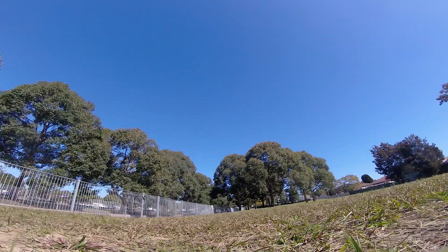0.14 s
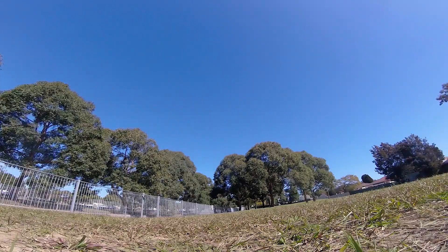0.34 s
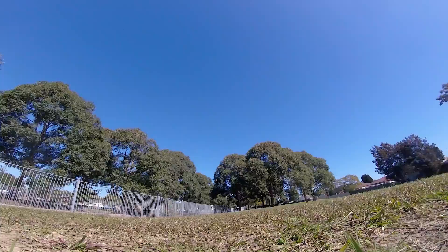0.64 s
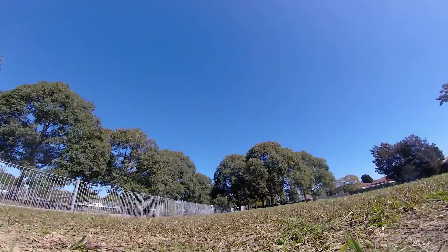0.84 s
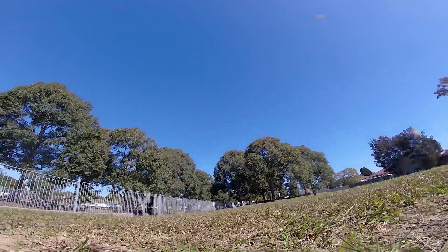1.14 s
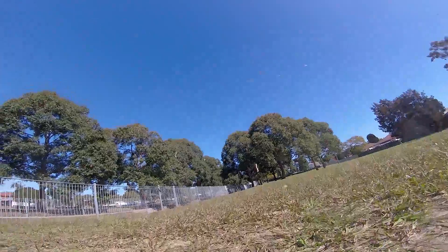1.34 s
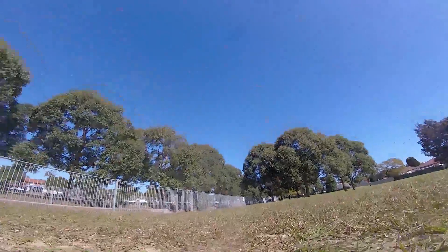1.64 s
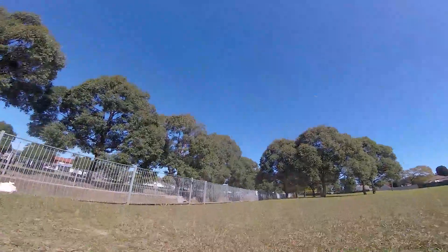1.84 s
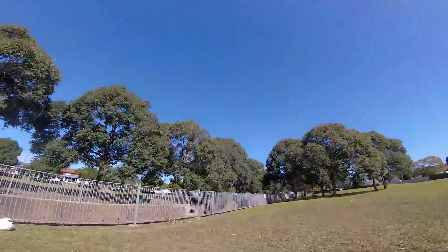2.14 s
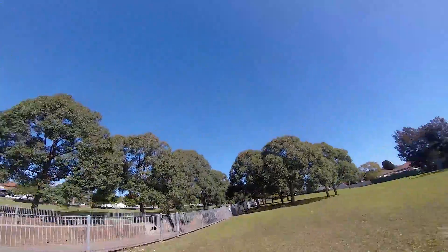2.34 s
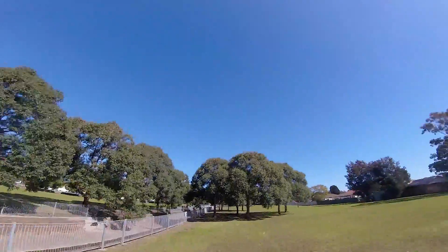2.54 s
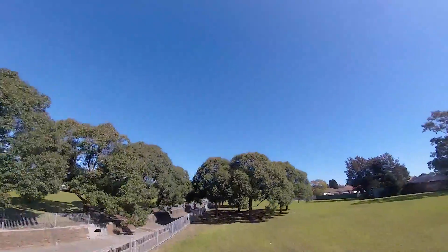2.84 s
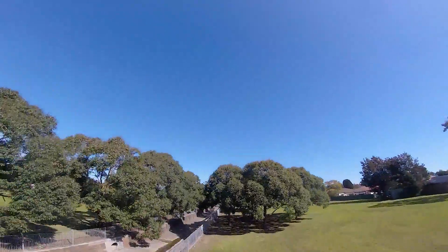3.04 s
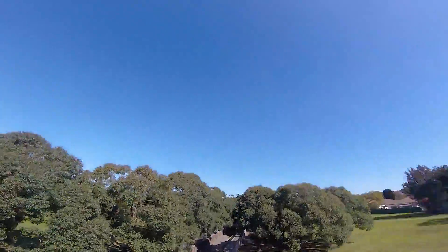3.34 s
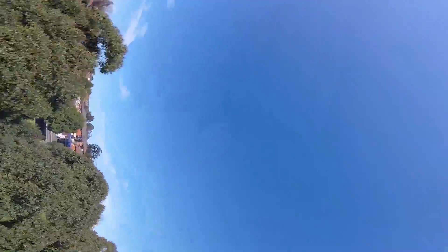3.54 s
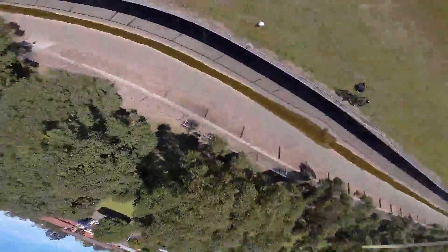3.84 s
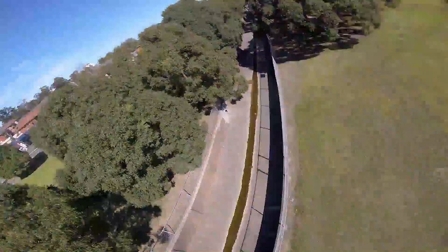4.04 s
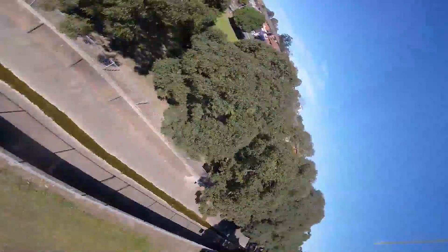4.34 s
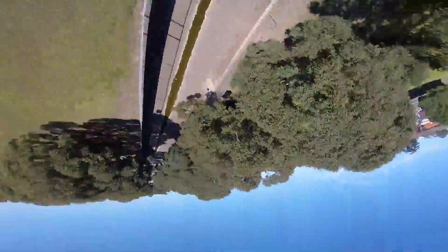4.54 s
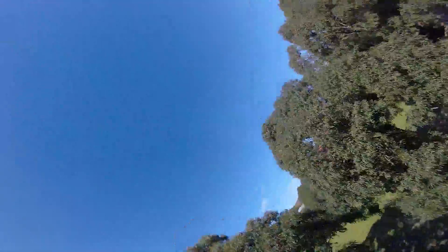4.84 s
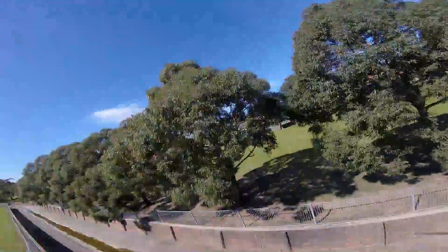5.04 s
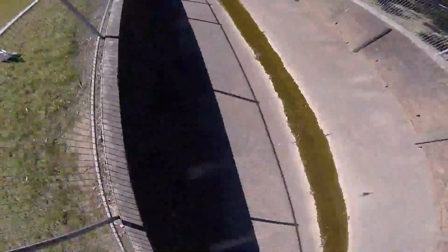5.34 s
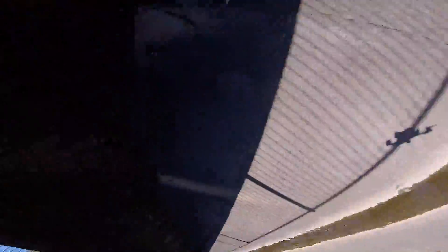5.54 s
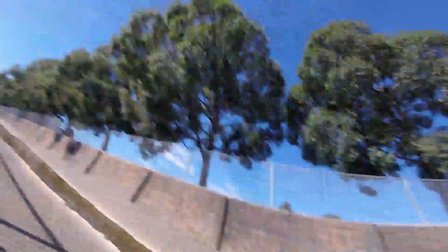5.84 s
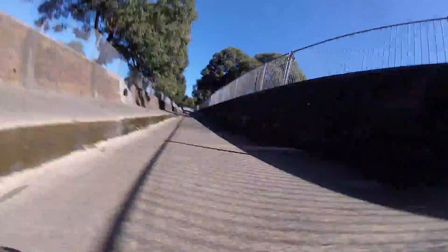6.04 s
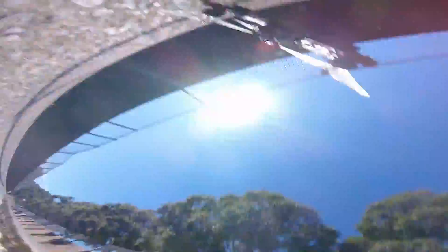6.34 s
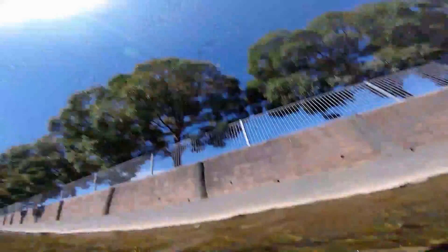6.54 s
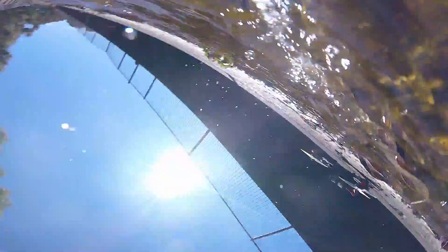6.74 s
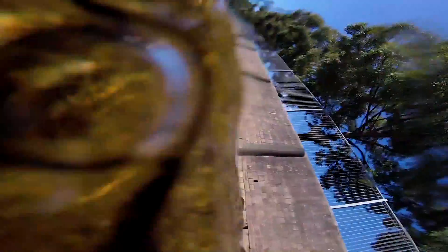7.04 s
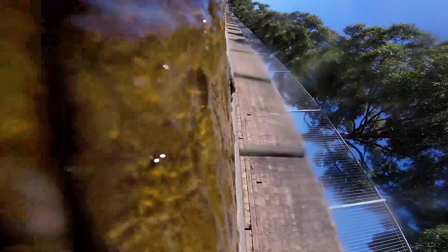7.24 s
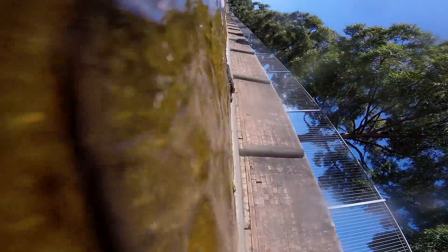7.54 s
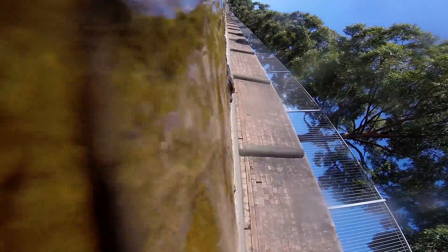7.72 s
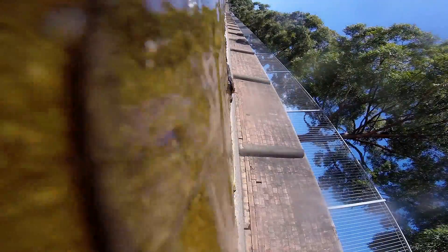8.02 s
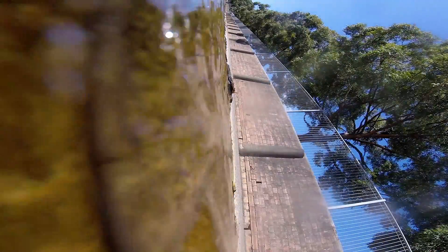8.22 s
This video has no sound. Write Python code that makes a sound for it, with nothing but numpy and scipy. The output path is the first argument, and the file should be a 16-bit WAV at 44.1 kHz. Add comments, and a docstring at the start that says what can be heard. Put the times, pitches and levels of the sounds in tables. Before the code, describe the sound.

Close on an onboard microphone, drone motors tick over softly on grass before the propellers spin up into a loud, wavering whine. A short rattle and a stuttering, falling squeal join in. The whine stops, leaving gusts of wind that swell in a dive. A string of hard, hollow knocks follows as the drone bounces on concrete, ending in a splash, plops and quiet bubbling.

```python
'''A racing quadcopter, heard from its own camera, idles on the grass, then climbs with whining
propellers and a rattling, squealing bearing. It coasts through a flip while a bird calls, then dives
in a growing rush of air. It tumbles down a concrete drain, each blow ringing the camera case,
and comes to rest in shallow water that plops, trickles and fizzes.'''
import sys
import numpy as np
from scipy import signal
from scipy.fft import rfft, irfft, next_fast_len
from scipy.io import wavfile
from scipy.ndimage import uniform_filter1d

SR = 44100
rng = np.random.default_rng(int(sys.argv[2]) if len(sys.argv) > 2 else 0)


def pcm_store(signal):
    """Save signal as 16-bit PCM."""
    levels = np.round(np.clip(np.atleast_2d(signal), -1, 1) * 32767)
    wavfile.write(sys.argv[1], SR, levels.astype(np.int16).T)


N = 369558
TIME = np.arange(N) / SR
LIFT_OFF_S, POWER_OFF_S = 1.17, 3.66


def gain_of(db):
    return 10 ** (np.asarray(db) / 20)


def unit_rms(x):
    return x / np.sqrt(np.mean(x ** 2) + 1e-20)


def phase_of(hz):
    return 2 * np.pi * np.cumsum(hz) / SR


def curves(rows):
    """Each column after time_s, joined by straight lines."""
    time_s, *columns = np.transpose(rows)
    return [np.interp(TIME, time_s, column) for column in columns]


def gate(start_s, end_s):
    """One from start to end, with 10 ms fades outside."""
    return np.clip(np.minimum(TIME - start_s, end_s - TIME) * 100 + 1, 0, 1)


def during(rows):
    return gate(rows[0][0], rows[-1][0])


def swell(peak_s, half_s):
    return np.exp(-np.minimum(((TIME - peak_s) / half_s) ** 2, 60))


def bursts(rows):
    """Envelope of Gaussian rises and exponential decays."""
    return sum(gain_of(db) * np.where(TIME < s, swell(s, rise_s), np.exp(-abs(TIME - s) / decay_s))
               for s, rise_s, decay_s, db in rows)


def add(mix, start_s, sound):
    part = mix[round(start_s * SR):][:len(sound)]
    part += sound[:len(part)]


def colour(x, spectrum):
    """Filters x by (freq_hz, gain_db) rows; unit RMS."""
    hz, db = np.transpose(spectrum)
    bins_hz = np.fft.rfftfreq(N, 1 / SR)
    bins_db = np.interp(np.log(bins_hz + 1), np.log(hz), db, left=-90, right=-120)
    return unit_rms(irfft(rfft(x) * gain_of(bins_db), N))


def noise(spectrum):
    return colour(rng.standard_normal(N), spectrum)


def drift(rate_hz):
    """Random wander up to about rate_hz; unit RMS."""
    size = next_fast_len(N)
    hz = np.arange(0, 10 * rate_hz, SR / size)
    bins = rng.standard_normal(len(hz)) + 1j * rng.standard_normal(len(hz))
    return unit_rms(irfft(bins / (1 + (hz / rate_hz) ** 4), size)[:N])


def noise_band(hz, width_hz):
    return unit_rms(drift(width_hz) * np.sin(phase_of(hz * np.ones(N))))


def crackle(per_s, spread_db):
    """Sparse clicks of uneven size."""
    clicks = (rng.random(N) < per_s / SR) * rng.choice([-1, 1], N)
    return clicks * gain_of(spread_db * np.minimum(rng.exponential(1, N), 4))


def resonate(x, hz, width_hz):
    """Unity-gain resonance, applied twice for steep skirts."""
    b, a = signal.iirpeak(hz, hz / width_hz, SR)
    return signal.lfilter(b, a, signal.lfilter(b, a, x))


# background spectrum: freq_hz, gain_db
AMBIENCE_SPECTRUM = [(50, -22.5), (100, 7), (300, -5.5), (400, -12), (1100, -17), (3700, -36),
                     (6200, -40.5), (6700, -32.5), (11000, -46.5)]

def ambience(level_db=-56):
    """Faint, steady outdoor rumble."""
    return gain_of(level_db) * noise(AMBIENCE_SPECTRUM)


# bird calls: start_s, top_pitch_hz, level_db
CHIRPS = [(4.125, 3350, -68), (4.23, 3270, -68), (4.345, 3200, -64), (4.46, 3100, -67)]

def bird(length_s=0.055):
    """Far chirps sweep up and turn over at the top."""
    out, progress = np.zeros(N), np.linspace(0, 1, round(length_s * SR))
    envelope = 2 * progress * np.sin(np.pi * progress)
    sweep = 1 - 0.71 * (progress - 0.7) ** 2
    for s, hz, db in CHIRPS:
        add(out, s, gain_of(db) * envelope * np.sin(phase_of(hz * sweep)))
    return out


# low surges: peak_s, rise_s, decay_s, level_db
SURGES = [(0.03, 0.059, 0.1, -33), (5.8, 0.058, 0.24, -41.5), (6.63, 0.042, 0.28, -46.5),
          (7.012, 0.018, 0.037, -20), (7.2, 0.01, 0.012, -25.5)]

def rumble(sunk_s=7.3, growth_db_per_s=12.5):
    """Breeze and water surge; the current builds against the sunken case."""
    current = gain_of(-62.5 + growth_db_per_s * (TIME - sunk_s)) * gate(sunk_s, TIME[-1])
    return noise(BUFFET_SPECTRUM) * (bursts(SURGES) + current)


# fine bubbles: time_s, level_db
FIZZ = [(7.46, -77), (7.5, -47), (7.58, -57.5), (7.73, -57), (7.77, -88)]

def fizz():
    """Fine bubbles tick on the sunken case."""
    level_db, = curves(FIZZ)
    bubbles = colour(crackle(per_s=800, spread_db=6.5), [(300, 6.5), (2000, 10), (5200, -5.5), (5900, -36)])
    return bubbles * gain_of(level_db) * during(FIZZ)


# inflow: time_s, centre_hz, level_db
TRICKLE = [(7.04, 2600, -62), (7.3, 2000, -71), (7.52, 2300, -61)]

def trickle():
    """Water bubbles unevenly into the case."""
    hz, db = curves(TRICKLE)
    return gain_of(db + 4.5 * drift(120)) * noise_band(hz, 600) * during(TRICKLE)


# air pockets: start_s, pitch_hz, level_db, t60_s
PLOPS = [(6.996, 468, -18, 0.087), (7.008, 1080, -24.5, 0.04), (6.997, 1720, -24, .05),
         (7.033, 1895, -22.5, 0.031)]

def plops(rise_s=0.0011, glide_per_s=0.55):
    """Trapped air rings with rising pitch as the case goes under."""
    out, t = np.zeros(N), np.arange(SR // 10) / SR
    for s, hz, db, t60 in PLOPS:
        envelope = gain_of(db - 60 * t / t60) * (1 - np.exp(-t / rise_s))
        add(out, s, envelope * np.sin(phase_of(hz * (1 + glide_per_s * t))))
    return out


# water slaps: peak_s, rise_s, decay_s, level_db
SPLASHES = [(6.999, 0.012, 0.0099, -26), (7.04, .012, 0.079, -49.5)]

def splashes():
    """Water slaps round the case."""
    churn = colour(crackle(per_s=900, spread_db=7), [(150, 8.5), (2400, -6), (3500, -20)])
    return churn * bursts(SPLASHES)


# grit on the case: freq_hz, gain_db
GRIT_SPECTRUM = [(300, 3), (1500, 17), (3500, 12.5), (5000, 15), (6000, 4), (6700, 14.5), (8000, -0.5),
                 (10000, -11.5), (14000, -53)]
# showers: peak_s, rise_s, decay_s, level_db
SHOWERS = [(6.585, 0.029, 0.025, -46.5), (6.9, 0.16, 0.12, -61)]

def spray():
    """Grit and spray shower the case."""
    return colour(crackle(per_s=3700, spread_db=6), GRIT_SPECTRUM) * bursts(SHOWERS)


# small hits: start_s, level_db
TICKS = [(5.639, -38), (5.801, -40.5), (6.906, -35), (7.202, -47), (7.433, -45), (7.508, -41)]

def ticks(decay_s=0.00084):
    """Small stones and drops tick on the case."""
    envelope = sum(gain_of(db) * (TIME >= s) * np.exp(-np.minimum(abs(TIME - s) / decay_s, 20))
                   for s, db in TICKS)
    return noise(GRIT_SPECTRUM) * envelope


def dust(level_db=-46):
    """Downwash throws dry grass and dust at the case."""
    grains = noise([(7800, -20), (8400, 0), (9500, 0), (12000, -16)])
    return gain_of(level_db) * swell(1.45, 0.35) * grains * gate(LIFT_OFF_S, POWER_OFF_S)


# frame resonances: peak_s, half_s, centre_hz, width_hz, level_db
FRAME_RINGS = [(1.497, 0.46, 6480, 240, -39), (5.444, 0.15, 6360, 400, -47)]

def frame_rings():
    """Narrow resonances flare under vibration and airflow."""
    rings = sum(gain_of(db) * swell(s, half_s) * noise_band(hz, width_hz)
                for s, half_s, hz, width_hz, db in FRAME_RINGS)
    return rings * gate(LIFT_OFF_S, AIRFLOW[-1][0])


# hollow notes: peak_s, half_s, pitch_hz, level_db
HOOTS = [(0.232, 0.013, 235, -14), (0.247, .018, 143.5, -15), (4.838, 0.0042, 950, -15.5)]

def hoots():
    """The propellers hoot briefly as they catch the air; a short hoot near 950 Hz rings with the blow at 4.84
    s."""
    return sum(gain_of(db) * swell(s, half_s) * np.sin(2 * np.pi * hz * TIME)
               for s, half_s, hz, db in HOOTS)


# swish band: time_s, centre_hz
SWISH = [(5.33, 1003), (5.38, 2710), (5.46, 3300), (5.52, 4870), (5.55, 3085), (5.61, 2000)]

def swish(band_db=-34, tearing_db=-35):
    """Air tears past in the dive, rising and falling with the angle of attack."""
    centre_hz, = curves(SWISH)
    band = gain_of(band_db) * noise_band(centre_hz, 1500)
    tearing = gain_of(tearing_db) * colour(crackle(per_s=2200, spread_db=4), GRIT_SPECTRUM)
    return swell(5.49, 0.096) * (band + tearing) * during(SWISH)


# air under thrust: time_s, wash_db, rush_db, hiss_db
PROP_AIR = [(1.15, -23.5, -37, -31), (1.195, -14, -36.5, -26), (1.45, -24, -31, -27.5),
            (1.63, -13, -31, -23), (2.07, -25, -23, -28), (2.25, -19.5, -24.5, -27),
            (2.69, -24.5, -27, -31), (2.85, -33.5, -33, -26.5), (3.15, -31.5, -29.5, -26.5),
            (3.4, -27, -21.5, -33.5)]
# coast and dive: time_s, level_db
AIRFLOW = [(3.41, -47), (3.82, -45.5), (4.0, -58), (4.4, -42.5), (4.65, -42.5), (4.75, -30), (5.0, -25),
           (5.1, -16.5), (5.3, -23), (5.635, -20.5)]
# gusts and throttle blips: peak_s, half_s, buffet_db, wash_db, rush_db, hiss_db
GUSTS = [(0.188, 0.0049, -30, -14, -50, -29.5), (0.243, 0.034, -28, -12.5, -45, -34.5),
         (0.99, 0.0046, -24, -13, -40, -55), (1.118, 0.021, -42, -22, -38, -29.5),
         (3.434, 0.025, -51, -25, -29, -41.5), (3.559, 0.15, -51, -34, -39.5, -58),
         (3.721, 0.044, -49, -23, -30, -52), (4.346, 0.33, -48, -55, -61, -93),
         (4.824, 0.019, -47, -40, -34, -61), (5.086, 0.0081, -16, -10.5, -39, -52),
         (5.169, 0.015, -26, -9, -24.5, -47), (5.219, 0.054, -33, -17.5, -27.5, -45.5),
         (5.471, 0.15, -26, -44, -25, -44)]
# layer balance, idling and coasting: buffet_db, wash_db, rush_db, hiss_db
IDLE_MIX_DB, AIRFLOW_MIX_DB = (-43, -26.5, -49.5, -44), (-2.5, 1, -29, -37)

def air_gains(idle_growth_db_per_s=10.5):
    """Buffet, wash, rush and hiss gains: idle, thrust, airflow and gusts add in power."""
    wash_db, rush_db, hiss_db = curves(PROP_AIR)
    thrust = gain_of([wash_db - 14.5, wash_db, rush_db, hiss_db]) * during(PROP_AIR)
    idle_db = idle_growth_db_per_s * (TIME - IDLE_S[0]) + 2 * drift(15.4)
    idling = np.outer(gain_of(IDLE_MIX_DB), gain_of(idle_db) * gate(*IDLE_S))
    flow_db, = curves(AIRFLOW)
    flow = np.outer(gain_of(AIRFLOW_MIX_DB), gain_of(flow_db) * during(AIRFLOW))
    gust_power = sum(np.outer(gain_of(db), swell(s, half_s)) ** 2 for s, half_s, *db in GUSTS)
    return np.sqrt(thrust ** 2 + idling ** 2 + flow ** 2 + gust_power) * gate(0, AIRFLOW[-1][0])


# air layers, low to high: freq_hz, gain_db
BUFFET_SPECTRUM = [(12, -25.5), (28, -2), (60, 1.5), (110, -4), (400, -33.5)]
WASH_SPECTRUM = [(70, -33.5), (140, -3), (240, 2.5), (350, -2.5), (480, -1.5), (660, -5), (800, -11),
                 (1000, -18), (2000, -31.5)]
RUSH_SPECTRUM = [(550, -17.5), (900, -1.5), (1300, -2.5), (1800, -3.5), (2400, -6), (3200, -8.5),
                 (3900, -20.5), (5500, -39.5)]
HISS_SPECTRUM = [(2800, 2.5), (4100, 0), (5000, 1.5), (6700, -1.5), (7600, -5.5), (8500, -16), (9600, -19),
                 (12000, -47.5)]

def air(shaft, blades=3):
    """Turbulence at the microphone: the upper layers share gusts; blades chop rush and hiss."""
    buffet_gain, wash_gain, rush_gain, hiss_gain = air_gains()
    gust = drift(40)
    chop = 1 + 0.31 * np.cos(blades * shaft) * gate(LIFT_OFF_S, POWER_OFF_S)
    buffet = noise(BUFFET_SPECTRUM) * buffet_gain
    wash = noise(WASH_SPECTRUM) * wash_gain * gain_of(-5.5 + 1.5 * gust)
    rush = noise(RUSH_SPECTRUM) * rush_gain * gain_of(-5 + 1.7 * gust)
    hiss = noise(HISS_SPECTRUM) * hiss_gain * gain_of(-10 + 1.3 * gust)
    return buffet + wash + chop * (rush + hiss) * gain_of(1.2 * drift(400))


# camera case modes: freq_hz, gain_db, t60_s
CASE_MODES = [(762, 3, 0.014), (920, -6.5, 0.0037), (1184, -1.5, 0.018), (1508, -4.5, 0.023),
              (2040, -1.5, 0.016), (6910, -14, 0.0056)]
# blows: start_s, push_db, contact_s, ring_db, grit_db, grit_decay_s
KNOCKS = [(0.092, -16.5, 0.003, -56, -36, 0.013), (.146, -39, 0.0011, -38, -26, 0.0013),
          (4.838, -27, 0.0012, -16.5, -60, 0.0044), (5.703, -5, 0.0029, -2.5, -11.5, 0.0021),
          (5.711, -2, 0.0062, -46, -40, 0.0052), (5.726, -16, 0.0038, -42.5, -36.5, 0.0093),
          (5.768, -18, 0.0033, -50, -40, 0.00092), (5.8958, -9, 0.0027, -48, -42.5, 0.0049),
          (5.905, -13, 0.0038, -47, -47, 0.00098), (6.119, -12.5, 0.047, -36.5, -27.5, 0.00039),
          (6.228, -22, 0.0044, -54, -41.5, 0.013), (6.241, -21, 0.0015, -47, -43, 0.0063),
          (6.253, -2.5, 0.0039, -50, -29, 0.0023), (6.303, -15, 0.002, -51, -43, 0.0061),
          (6.3227, -27, 0.0013, -36, -32.5, 0.0066), (6.3258, -7.5, 0.0013, -50, -54, 0.0013),
          (6.4118, -11.5, 0.0024, -44, -36, 0.0014), (6.4255, -0.5, 0.00018, -33.5, -34, 0.0019),
          (6.7357, -1.5, 0.0019, -15.5, -26, 0.0027), (6.865, -4, 0.0023, -10, -27.5, 0.0034),
          (6.954, -10, 0.00056, -15.5, -39.5, 0.004), (6.994, -8, 0.0074, -19, -46, 0.0044),
          (7.307, -21.5, 0.0024, -22.5, -55, 0.00059), (7.6876, -13, 0.000071, 5, -22.5, 0.00062),
          (7.748, -35, 0.00012, -48, -23, 0.00082)]

def knocks(rise_s=0.00028, release_s=0.00093, rebound=0.54, recover_s=0.0012, leak_hz=28):
    """Each blow squeezes the case, rings its modes, judders the frame and crunches grit."""
    pushes, out, t = np.zeros(N), np.zeros(N), np.arange(SR // 8) / SR
    grit, judder = noise(GRIT_SPECTRUM), noise(WASH_SPECTRUM)
    press = 1 - np.exp(-(t / rise_s) ** 2)
    for s, push_db, contact_s, ring_db, grit_db, decay_s in KNOCKS:
        free_s = np.maximum(t - contact_s, 0)
        let_go = 1 - np.exp(-(free_s / release_s) ** 2)
        spring_back = let_go * (1 + rebound * np.exp(-free_s / recover_s))
        add(pushes, s, gain_of(push_db) * (press - spring_back) * np.exp(-t / 0.014))
        detunes = 1 + 0.15 * rng.standard_normal(len(CASE_MODES))  # each blow lands on another spot
        damping = 8 if s > PLOPS[-1][0] else 1  # water deadens the case
        ring = sum(gain_of(db - 60 * damping * t / t60) * np.sin(2 * np.pi * hz * detune * t)
                   for (hz, db, t60), detune in zip(CASE_MODES, detunes))
        span = slice(round(s * SR), round(s * SR) + len(t))
        add(out, s, gain_of(ring_db) * press * ring / 2)
        add(out, s, gain_of(push_db - 17.5) * press * np.exp(-t / (2 * decay_s)) * judder[span])
        add(out, s, gain_of(grit_db) * np.exp(-t / decay_s) * grit[span])
    # held pressure leaks away, leaving a slow undershoot
    b, a = signal.butter(1, leak_hz, "high", fs=SR)
    return out + signal.lfilter(b, a, signal.lfilter(b, a, pushes))


# bearing hits: start_s, level_db
RATTLES = [(2.213, -15.5), (2.267, -7), (2.2705, -11), (2.368, -16), (3.441, -28)]
# ring of each hit: freq_hz, gain_db, t60_s
RATTLE_MODES = [(1970, -3.5, .02), (2746, -4, .024)]

def bearing_rattle(squeak_hz=5700, squeak_db=-37.5):
    """The loose bearing clatters in its housing and gives tiny squeaks."""
    out, t = np.zeros(N), np.arange(SR // 10) / SR
    for s, db in RATTLES:
        for hz, mode_db, t60 in RATTLE_MODES:
            mode = np.sin(2 * np.pi * hz * rng.uniform(0.94, 1.06) * t)
            add(out, s, gain_of(db + mode_db - 60 * t / t60) * mode)
    squeaks = unit_rms(resonate(crackle(per_s=50, spread_db=6), squeak_hz, 700))
    return out + gain_of(squeak_db) * squeaks * gate(2.15, 2.44)


# sagging squeal: time_s, pitch_hz, chatter_depth
SQUEAL = [(2.745, 2570, 0.41), (2.775, 2427, .6), (2.812, 2636, 0.29), (2.86, 2413, .6), (2.95, 2374, 0.2),
          (3.07, 2340, 0.13), (3.18, 2222, 0.4), (3.25, 1946, .45), (3.39, 1882, 0.82)]
# bearing grips: peak_s, half_s, level_db, stutter_depth
GRIPS = [(2.75, 0.012, -9, 0.32), (2.781, .012, -14, .7), (2.813, 0.025, -9.5, 0.22),
         (2.88, 0.019, -13, 0.93), (2.92, .02, -14.5, 0.21), (2.974, 0.023, -11.5, 1.3),
         (3.059, .038, -14.5, 0.79), (3.111, .016, -13.5, 1), (3.162, 0.015, -11.5, 1.3),
         (3.221, .024, -12, 0.86), (3.276, .016, -14, .9), (3.318, 0.011, -12, 1),
         (3.379, 0.0061, -12, 0.85), (3.395, .006, -16, 1.06)]

def bearing_squeal(shaft, bend_rad=0.22, scrape_rad=0.22, rasp_db=-19):
    """The dry bearing grips and sings; its note swells and flattens once per shaft turn."""
    hz, chatter = curves(SQUEAL)
    grip_powers = [gain_of(db) ** 2 * swell(s, half_s) for s, half_s, db, _ in GRIPS]
    power = sum(grip_powers)
    depth = sum(weight * grip[-1] for weight, grip in zip(grip_powers, GRIPS)) / power
    stutter = np.exp(depth * np.cos(shaft)) / np.sqrt(np.i0(2 * depth))  # unit RMS over a turn
    phase = phase_of(hz * (1 + 0.03 * chatter * drift(150)))
    phase += scrape_rad * drift(900) - bend_rad * depth * np.sin(shaft)
    overtones = gain_of(-18) * np.sin(2 * phase + drift(200) / 2) + gain_of(-25) * np.sin(3 * phase)
    rasp = gain_of(rasp_db) * noise_band(5300, 900) / 2
    note = (np.sin(phase) + overtones) * (1 + chatter * drift(120) / np.sqrt(2))
    return np.sqrt(power) * gate(SQUEAL[0][0], POWER_OFF_S) * stutter * (note + rasp)


IDLE_S = (0.144, 1.118)
POLE_ORDER = 42  # whine cycles per shaft turn

def idle(ping_s=0.0915, ping_hz=6000, ping_t60_s=0.28):
    """The motors ping, then tick over, hunting in speed and ringing the frame."""
    age_s = np.maximum(TIME - ping_s, 0)
    ping = gain_of(-37 - 60 * age_s / ping_t60_s) * np.sin(2 * np.pi * ping_hz * age_s)
    hunting = 1 + 0.05 * np.sin(phase_of(24 + 4 * drift(10))) + 0.03 * drift(10)
    slow_motor = gain_of(-54) * (1 + 0.5 * drift(40)) * np.sin(POLE_ORDER * phase_of(59 * hunting))
    fast_motor = gain_of(-48) * swell(0.89, 0.26) * np.sin(POLE_ORDER * phase_of(73 * hunting))
    frame = gain_of(-57.5) * unit_rms(resonate(rng.standard_normal(N), 7240, 170))
    return ping + (slow_motor + fast_motor + frame) * gate(*IDLE_S)


def pole_whine(shaft, level_db=-25, ring_hz=7850):
    """Magnet poles pass the windings; the whine flares on crossing a frame resonance."""
    poles = np.sin(POLE_ORDER * shaft) * (1 + 1.1 * np.sin(shaft) + 0.5 * drift(150))
    fade = np.interp(TIME, [1.45, 1.8, 2.3], [1, 0.25, 0])
    return gain_of(level_db) * resonate(poles, ring_hz, 600) * fade * gate(LIFT_OFF_S, POWER_OFF_S)


# frame vibration: time_s, pitch_hz, level_db
SHUDDER = [(1.2, 83, -30.5), (1.7, 76.84, -28), (2.15, 70.72, -33.5), (2.72, 57.71, -29)]

def shudder():
    """The frame shakes under thrust."""
    hz, db = curves(SHUDDER)
    return gain_of(db) * np.sin(phase_of(hz * (1 + 0.032 * drift(60)))) * during(SHUDDER)


# shared speed after levelling, before speed_ratio: time_s, shaft_hz
THROTTLE = [(2.36, 232), (2.53, 227), (2.65, 178.6), (2.83, 255), (3.05, 256), (3.419, 218), (3.66, 85)]
# frame response, propeller to camera: freq_hz, gain_db
FRAME_RESPONSE = [(100, -7), (215, 2), (290, -0.5), (550, 3.5), (780, -0.5), (1080, -3.5), (1340, 1)]
# blade buzz, swelling through the climb and easing as the squeal begins: time_s, gain_db
BUZZ = [(1.4, -14), (1.9, -7), (2.3, 1), (2.65, 1), (2.9, -6)]

def motor(speeds, prop, level_db, speed_ratio, jitter, db_per_octave, fade_db_per_s):
    """Shaft and blade tones: louder when faster, fainter as the craft leaves the ground."""
    throttle = [(s, hz * speed_ratio) for s, hz in THROTTLE if s > speeds[-1][0]]
    target_hz, = curves(speeds + throttle)
    hz = uniform_filter1d(target_hz, size=1500)  # rotor inertia
    shaft = phase_of(hz * (1 + jitter * drift(45)))

    def harmonic(order, db):
        return gain_of(db) * np.sin(order * shaft + rng.uniform(0, 2 * np.pi))

    tones = sum(harmonic(k, db + np.interp(k * hz, *np.transpose(FRAME_RESPONSE))) for k, db in prop)
    # three blades: every third overtone stands out
    buzz = sum(harmonic(k, -7.5 * np.log2(k / 4) + 8 * (k % 3 == 0)) for k in range(4, 14))
    buzz_db, = curves(BUZZ)
    tones += gain_of(buzz_db + (-22 - level_db) / 2) * buzz / 2
    climb_s = np.maximum(TIME - LIFT_OFF_S, 0)
    loud_db = level_db + db_per_octave * np.log2(hz / 220) - fade_db_per_s * climb_s
    loud_db -= 150 * np.maximum(TIME - THROTTLE[-2][0], 0)  # unloaded blades fall quiet
    spool_up = np.minimum(climb_s / 0.041, 1)
    return tones * gain_of(loud_db + 2 * drift(27)) * spool_up * gate(LIFT_OFF_S, POWER_OFF_S), shaft


# three-blade propeller tones: shaft_order, gain_db
TRUE_PROP = [(1, -12.5), (2, -20.5), (3, 3.5)]
BENT_PROP = [(1, 6), (2, -13), (3, -4)]
# motor speeds while the craft levels after lift-off: time_s, shaft_hz
SPEED_A = [(1.2, 74), (1.31, 168), (1.37, 189), (1.48, 149), (1.7, 71), (1.78, 105), (1.88, 177),
           (2.0, 202), (2.08, 194), (2.135, 154), (2.2, 196)]
SPEED_B = [(1.2, 89.4), (1.45, 135), (1.63, 202.9), (1.74, 218.2), (1.9, 169.7), (2.1, 159.9), (2.2, 205)]
SPEED_C = [(1.17, 195.7), (1.22, 231), (1.35, 204.8), (1.44, 130.3), (1.62, 198), (1.8, 222.8),
           (1.95, 205.2), (2.07, 160.2), (2.2, 263), (2.6, 215.2)]
SPEED_D = [(1.17, 206.6), (1.33, 205.9), (1.46, 129.9), (1.7, 200.9), (1.93, 212.7), (2.1, 164.6),
           (2.2, 250.8)]

def motors():
    """Four motors, two with bent propellers that beat; also returns one bent shaft's phase."""
    a, true_shaft = motor(SPEED_A, TRUE_PROP, level_db=-16, speed_ratio=0.98, jitter=0.0054,
                          db_per_octave=10.5, fade_db_per_s=8.5)
    b, _ = motor(SPEED_B, TRUE_PROP, level_db=-20, speed_ratio=0.98, jitter=0.016,
                 db_per_octave=8, fade_db_per_s=10.5)
    c, bent_shaft = motor(SPEED_C, BENT_PROP, level_db=-21.5, speed_ratio=1.03, jitter=0.01,
                          db_per_octave=15.5, fade_db_per_s=8)
    d, _ = motor(SPEED_D, BENT_PROP, level_db=-24, speed_ratio=1.01, jitter=0.014,
                 db_per_octave=12, fade_db_per_s=6.5)
    return a + b + c + d + shudder() + pole_whine(true_shaft), bent_shaft


def scene():
    """Flight, crash and water over a quiet background; mono."""
    rotors, shaft = motors()
    flight = rotors + idle() + bearing_squeal(shaft) + air(shaft)
    flight += frame_rings() + dust() + hoots() + swish() + bearing_rattle()
    crash = knocks() + ticks() + spray()
    water = splashes() + fizz() + plops() + trickle()
    return (flight + crash + water + rumble() + bird() + ambience())[None]


def record(dry, ceiling=0.93, rolloff_hz=10800, edge_hz=15000):
    """The hardest blows overload the microphone; treble rolls off up to a steep band limit."""
    limited = dry / (1 + (dry / ceiling) ** 8) ** (1 / 8)
    dulled = signal.lfilter(*signal.butter(3, rolloff_hz, fs=SR), limited)
    band_limit = signal.firwin(255, edge_hz, window=("kaiser", 9), fs=SR)
    return signal.oaconvolve(dulled, band_limit[None], "same")


dry = scene()
out = record(dry)
pcm_store(out)
```